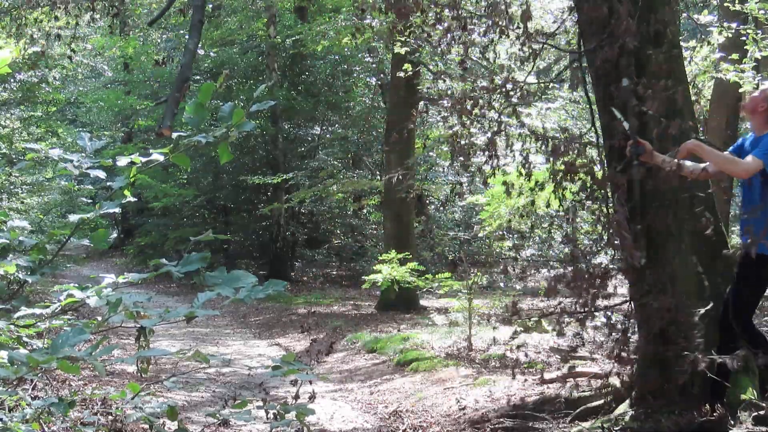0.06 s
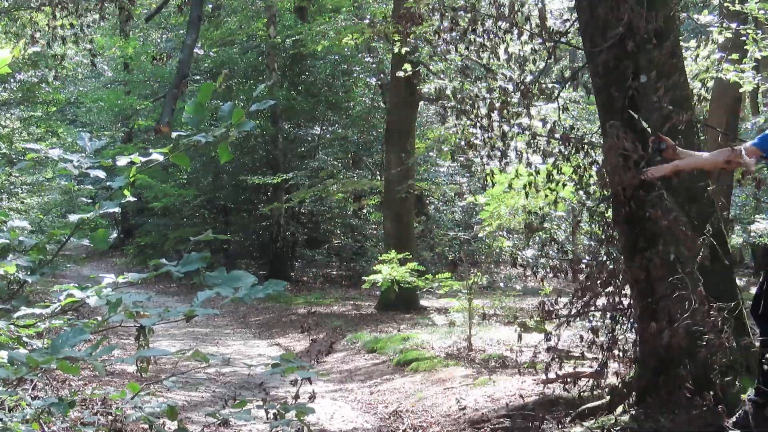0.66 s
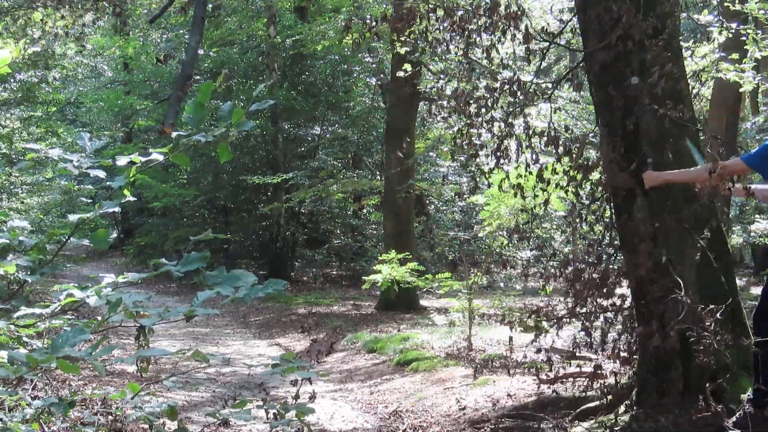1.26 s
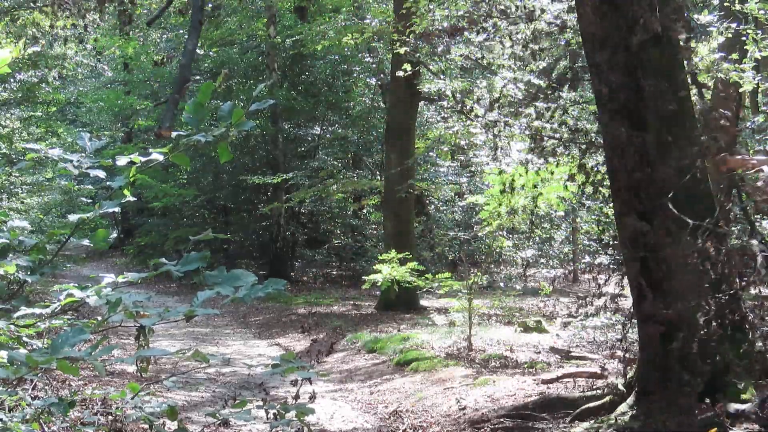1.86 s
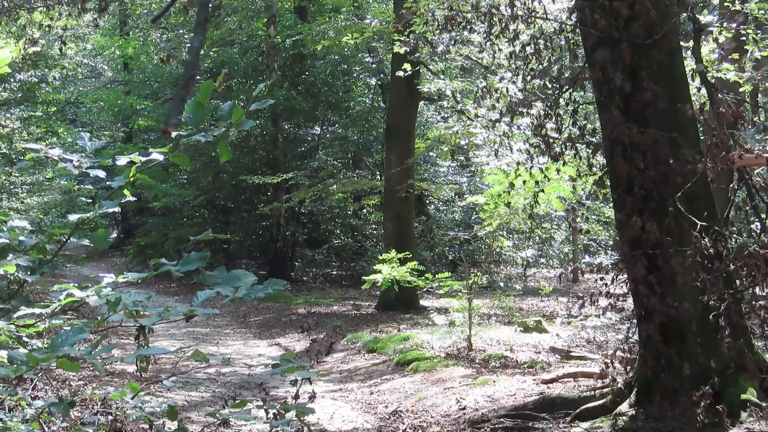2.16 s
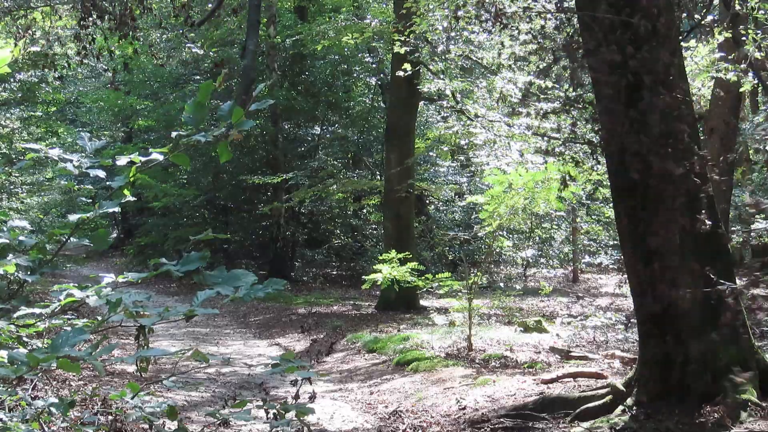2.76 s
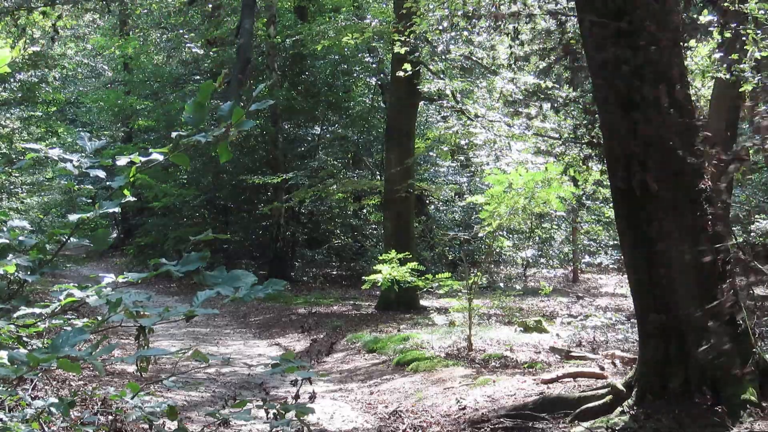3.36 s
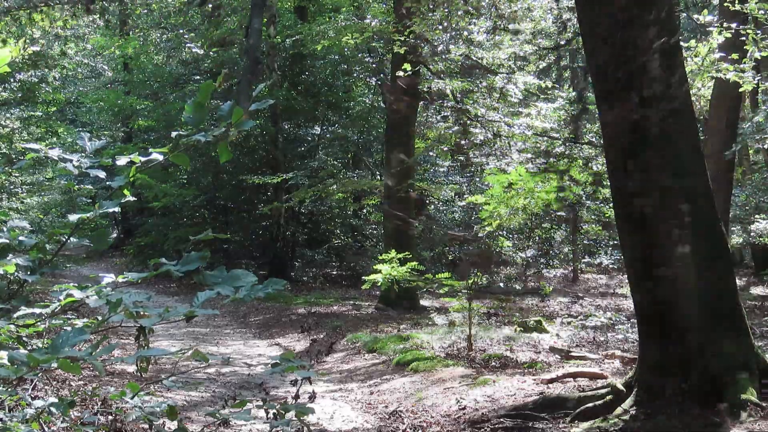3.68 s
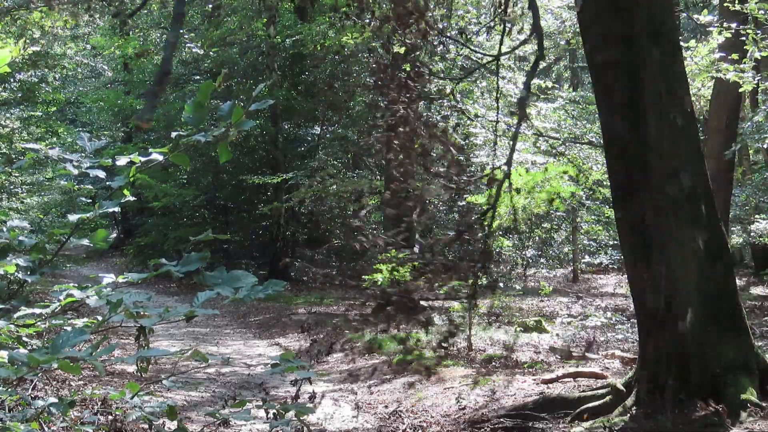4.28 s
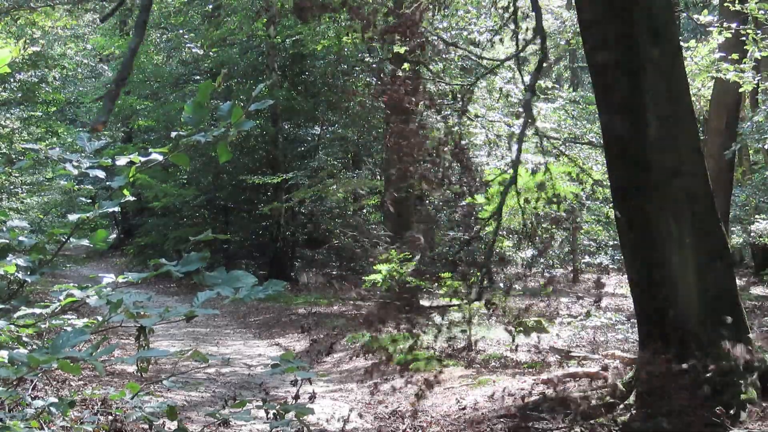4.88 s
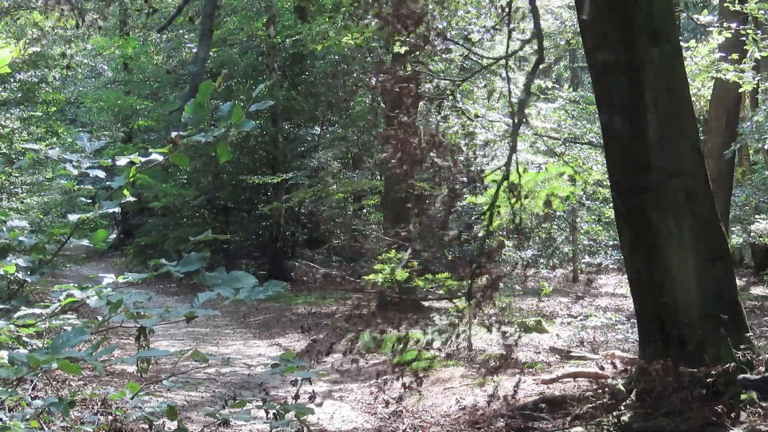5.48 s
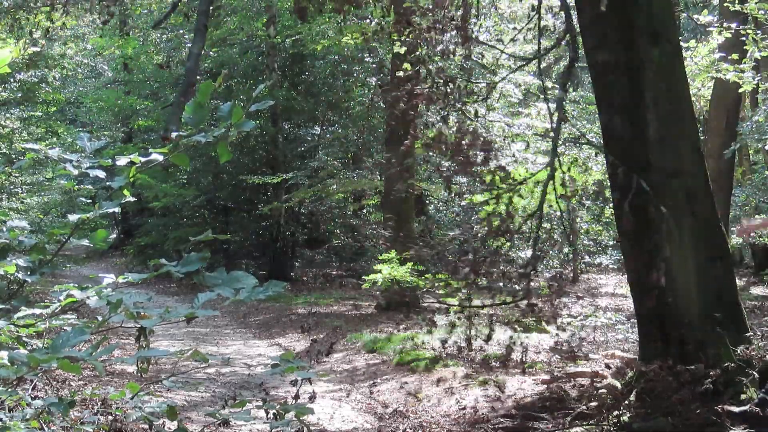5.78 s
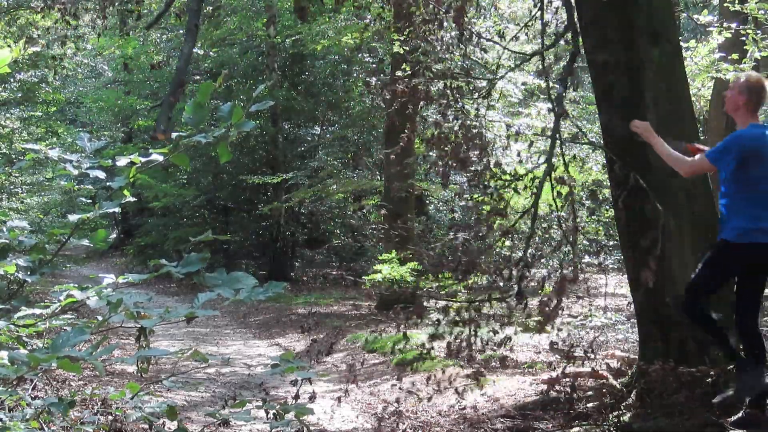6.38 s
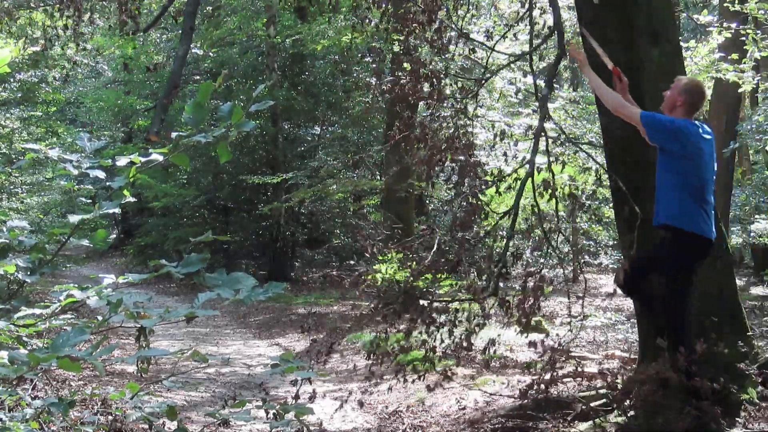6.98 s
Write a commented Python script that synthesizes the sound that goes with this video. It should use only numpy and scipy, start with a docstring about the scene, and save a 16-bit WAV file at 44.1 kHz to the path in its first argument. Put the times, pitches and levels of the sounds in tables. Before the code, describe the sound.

Crisp leaves shake and twigs scrape as someone pulls on a dead limb, slightly to the right in stereo. The wood gives way in a single loud, splintering crack, followed by sharp twig snaps. A swell of rustling ends in a short, hollow knock as the limb lands. After a lull come a few dull footfalls and crackles, over the faint low rumble of still forest air.

```python
"""Dry leaves rustle over the still air of a quiet wood: a dead limb is being pulled off a trunk,
just right of the stereo microphones. Its fibres tear and the wood rings in one loud crack; twigs snap,
the crown sweeps down and the butt knocks on the ground. Then the leaves settle and feet scuffle at
the trunk. Near foliage and far trees scatter every blow back."""
import sys
import numpy as np
from scipy import signal
from scipy.fft import rfft, irfft
from scipy.io import wavfile

SR = 44100
rng = np.random.default_rng(int(sys.argv[2]) if len(sys.argv) > 2 else 0)


def to_wav(s):
    """Save 16-bit WAV."""
    ch = np.atleast_2d(s).T  # columns
    pcm = np.round(np.clip(ch, -1, 1) * 32767)  # PCM
    wavfile.write(sys.argv[1], SR, pcm.astype(np.int16))


N = 310464

# still forest air: (frequency [Hz], relative density [dB])
AIR_COLOUR = [(20, -8.5), (45, 0), (65, 0.5), (95, -6.5), (150, -6), (230, -9.5), (380, -11), (520, -13.5),
              (750, -15.5), (1300, -21), (3000, -26.5), (7000, -33), (15000, -55)]
# how alike the quiet background is at the two microphones: (frequency [Hz], likeness [0-1])
AIR_LIKENESS = [(30, 0.99), (70, 0.99), (140, 0.77), (280, 0.01), (600, 0.09), (1200, 0.05), (4000, 0.36),
                (12000, 0.7)]
# a faint steady hum: (frequency [Hz], width [Hz], level [dB])
HUM_BANDS = [(497, 39, -71.5), (960, 56, -71)]
# what trunks and foliage throw back: (frequency [Hz], gain [dB])
ECHO_COLOUR = [(100, 8), (350, -8), (700, 5.5), (1400, 0.5), (2500, -3.5), (4000, 0.5), (7000, 5),
               (14000, 4.5)]
# how long the far trunks answer: (frequency [Hz], t60 [s])
ECHO_T60 = [(100, 0.77), (700, 0.51), (2000, 0.66), (5000, 0.77), (14000, 0.63)]
# dry leaves ticking: (frequency [Hz], relative density [dB])
LEAF_COLOUR = [(1200, -11.5), (2500, -7), (4000, -4), (5500, -1.5), (7300, -0.5), (10000, -5.5),
               (13000, -5), (15500, -16)]
# twigs scraping: (frequency [Hz], relative density [dB])
SCRAPE_COLOUR = [(90, -23), (180, -3), (400, 0), (800, -2.5), (1100, -2.5), (1700, 3), (2600, -1),
                 (4000, -12.5), (8000, -19)]
# each tug, swing or fall shakes the crown: (start [s], swell [s], hold [s], leaves [dB], twigs [dB])
SHAKES = [(-0.02, 0.12, 0.14, -53, -61.5), (0.323, 0.074, 0.14, -61, -66),
          (1.04, 0.044, 0.092, -70.5, -85.5), (1.282, 0.054, 0.27, -63, -75),
          (1.575, 0.49, 0.15, -49.5, -55), (2.215, 0.037, 0.025, -46, -60), (2.461, 0.086, 0.27, -53, -60),
          (2.747, 0.094, 0.037, -52, -56.5), (2.983, 0.055, 0.093, -54, -60),
          (3.24, 0.049, 0.1, -59, -64.5), (3.414, 0.24, 0.2, -44.5, -52), (4.087, 0.14, 0.12, -50.5, -57.5),
          (4.302, 0.15, 0.23, -46, -51), (4.584, 0.046, 0, -42, -57), (4.957, 0.064, 0.037, -55.5, -59),
          (5.49, .08, 0, -57.5, -67), (5.806, 0.13, 0.36, -61.5, -69.5), (6.384, 0.023, 0.048, -61, -69.5),
          (6.544, 0.085, 0.043, -51, -56.5), (6.69, 0.14, 0, -56, -81)]
# limb and feet on the ground: (time [s], level [dB], treble cutoff [Hz], t60 [s])
THUDS = [(.618, -50.5, 1400, 0.06), (1.366, -53, 1200, .05), (1.925, -46, 260, .2),
         (2.095, -46.5, 400, 0.12), (2.808, -48.5, 890, 0.081), (4.3964, -48.5, 503, 0.14),
         (4.6157, -31.5, 1600, 0.03), (4.6239, -37, 600, 0.049), (4.637, -58, 1400, 0.032),
         (4.645, -51.5, 220, 0.13), (6.042, -56, 1290, 0.22), (6.583, -52, 300, .13),
         (6.618, -48, 340, .18), (6.719, -51, 322, 0.16)]
# the butt's knock, choked by the soil: (frequency [Hz], level [dB], t60 [s])
BUTT_MODES = [(425, -30.5, 0.033), (725, -30.5, 0.029), (1040, -26.5, 0.023), (1600, -27, 0.013),
              (2080, -38, .012)]
# the louder twigs breaking: (time [s], ring [dB], pitch [Hz], splinters [dB], splinter t60 [s])
SNAPS = [(0.6173, -46, 1160, -59, .018), (1.2982, -50, 4260, -55.5, .07), (1.364, -51, 2150, -48.5, 0.054),
         (1.368, -48, 5200, -54, .04), (2.2433, -53, 2380, -42.5, .06), (2.739, -26.5, 3040, -31, 0.025),
         (2.8067, -34, 2260, -27, 0.022), (2.8101, -38.5, 1260, -36, 0.036),
         (3.523, -54, 2960, -44.5, 0.096), (3.7868, -42, 1790, -42, 0.023), (4.3148, -45, 4480, -38, .02),
         (4.397, -46, 1680, -44.5, .07), (4.6217, -50, 3000, -35, .034), (4.637, -40, 2220, -37.5, 0.13),
         (6.041, -50, 1110, -56, 0.045), (6.486, -52, 4160, -60, .035), (6.5466, -53, 4300, -56, 0.044),
         (6.572, -49, 4570, -49, .035), (6.616, -45, 2080, -46, 0.16), (6.857, -54, 5400, -52, 0.046)]
# the ring of a snapped twig: (multiple of its pitch [ratio], relative level [dB])
STICK_MODES = [(1, 3), (1.08, -9), (1.38, -16), (1.7, -15), (.72, -27)]
# a twig's fine fibres tearing: (frequency [Hz], relative density [dB])
SPLINTER_COLOUR = [(60, -37), (200, -28), (700, -5), (1500, 3), (3000, 7), (5500, 1), (8000, -2.5),
                   (12000, -3.5), (15500, -15)]
# the limb's thick fibres tearing: (frequency [Hz], relative density [dB])
CRACK_COLOUR = [(60, -30), (160, -15), (320, 4), (700, -25.5), (1050, -6), (1400, -5), (2000, 2),
                (3000, 3.5), (4600, -1.5), (7000, -6.5), (10000, -11), (13000, -14), (15500, -24)]
# the ring of the whole limb: (frequency [Hz], relative level [dB], t60 before the cap in struck_wood [s])
LIMB_MODES = [(136, -24, .1), (347, -10, 0.033), (394, -32, 0.063), (644, -17, 0.11), (727, -6, 0.033),
              (880, -6.5, 0.064), (1140, -7, 0.019), (1353, -4, 0.029), (1550, 3.5, 0.06),
              (1786, -3.5, 0.036), (1880, -2, 0.017), (2060, -4, 0.041), (2470, -15, 0.063),
              (2630, -13.5, 0.034), (2830, -9, 0.028), (3420, -22, 0.016), (4510, -7, 0.024),
              (7350, -12, 0.021)]
# the limb gives way in a quick run: (time [s], ring [dB], splinters [dB], splinter t60 [s])
RUPTURES = [(1.8862, -53, -24.5, 0.054), (1.8873, -28, -10, 0.015), (1.89, -49, -27, 0.013),
            (1.8925, -24, -34, 0.017), (1.8941, -17, -45, 0.042), (1.9002, -26.5, -31, 0.11),
            (1.912, -43, -34, 0.17), (1.945, -66, -45, 0.68)]


def from_db(db):
    """Decibels to gain."""
    return 10 ** (np.asarray(db) / 20)


def rms_one(x):
    """Scale to rms 1."""
    return x / np.sqrt(np.mean(x ** 2) + 1e-20)


def at_hz(points, hz):
    """A curve read on a log-frequency axis."""
    f, value = np.transpose(points)
    return np.interp(np.log(np.maximum(hz, 1)), np.log(f), value)


def bins(x):
    """Frequencies of the transform of x."""
    return np.fft.rfftfreq(x.shape[-1], 1 / SR)


def coloured(x, spectrum):
    """Filter x by a smooth spectrum."""
    return irfft(rfft(x) * from_db(at_hz(spectrum, bins(x))), x.shape[-1])


def filtered(x, kind, hz, order):
    """A Butterworth low-pass or high-pass."""
    return signal.sosfilt(signal.butter(order, hz, kind, fs=SR, output="sos"), x + 1e-18)


def drift(per_s):
    """A random wander through per_s values a second."""
    knots = rng.standard_normal(4096)
    return np.interp(np.arange(N) / SR * per_s, np.arange(len(knots)), knots)


def dying(t60, size=16384):
    """An envelope that falls 60 dB in t60 seconds."""
    return from_db(-60 * np.arange(size) / SR / t60)


def add(out, start_s, sound):
    """Mix a sound in at start_s."""
    i = round(start_s * SR)
    out[i:i + len(sound)] += sound[:N - i]


def stereo_noise(likeness, size):
    """White noise on which the two microphones agree more in some bands than in others."""
    white = rng.standard_normal((2, size))
    mid, side = rfft(white)
    alike = np.clip(at_hz(likeness, bins(white)), 0, 1)
    return irfft(np.sqrt(1 + alike) * mid + np.sqrt(1 - alike) * side * [[1], [-1]], size)


def hum(hz, width_hz):
    """Noise in one narrow resonance, heard as a blurred tone."""
    radius, angle = np.exp(-np.pi * width_hz / SR), 2 * np.pi * hz / SR
    poles = [1, -2 * radius * np.cos(angle), radius ** 2]
    return rms_one(signal.lfilter([.5, 0, -.5], poles, rng.standard_normal(N)))


def forest_air(level_db=-57.5, waver_db=1.0):
    """The bed of the place: a low, far rumble that wavers slightly, with a faint hum in it."""
    air = rms_one(coloured(stereo_noise(AIR_LIKENESS, N), AIR_COLOUR))
    air *= from_db(level_db - waver_db * drift(per_s=7.3))
    return air + sum(from_db(db) * hum(hz, width_hz) for hz, width_hz, db in HUM_BANDS)


def tree_echoes(blows, near_db=5.5, near_t60=0.047, build_s=0.0024):
    """Foliage near the microphones scatters a quick wash of echoes, far trunks a longer tail."""
    noise = stereo_noise([(200, 1.0), (2000, 1.0), (4500, 0.88), (8000, 0.54), (13000, 0.17)], SR)
    spectrum, hz, tail = rfft(noise), bins(noise), 0
    near = from_db(near_db) * dying(near_t60, SR)
    edges_hz = np.geomspace(50, SR / 2, 14)
    for low, high in zip(edges_hz, edges_hz[1:]):
        band = irfft(spectrum * ((hz >= low) & (hz < high)), SR)
        far = dying(at_hz(ECHO_T60, np.sqrt(low * high)), SR)
        tail += band * (near + far)
    tail *= 1 - np.exp(-np.arange(SR) / SR / build_s)
    response = coloured(rms_one(tail) / np.sqrt(SR), ECHO_COLOUR)
    return signal.fftconvolve(blows[None], response, axes=1)[:, :N]


def shake(t, swell_s, hold_s, calm_db_per_s):
    """One shake, t seconds after its start: it swells, holds while the limb moves, then dies away."""
    swell = np.sin(np.pi / 2 * np.clip(t / swell_s, 0, 1))
    return swell * from_db(-calm_db_per_s * np.maximum(t - swell_s - hold_s, 0))


def agitation(leaf_rest_db=-76, twig_rest_db=-78, flutter_db=-10):
    """Gains of leaves and twigs: never quite still, and overlapping shakes add in power."""
    t = np.arange(0, N, 64) / SR
    leaf_power, twig_power = from_db(leaf_rest_db) ** 2, from_db(twig_rest_db) ** 2
    for start, swell_s, hold_s, leaf_db, twig_db in SHAKES:
        age = t - start
        # most leaves calm down quickly, but a few flutter on
        rush = from_db(leaf_db) * shake(age, swell_s, hold_s, calm_db_per_s=63.5)
        flutter = from_db(leaf_db + flutter_db) * shake(age, swell_s, hold_s, calm_db_per_s=11)
        scrape = from_db(twig_db) * shake(age, swell_s, hold_s, calm_db_per_s=45.5)
        leaf_power += rush ** 2 + flutter ** 2
        twig_power += scrape ** 2
    return [np.interp(np.arange(N) / SR, t, np.sqrt(power)) for power in (leaf_power, twig_power)]


def rustle(colour, per_s, clump_db, lag_spread_s=1.5e-5):
    """Countless tiny contacts in clumps; each reaches the two microphones with a lag of its own."""
    touched = rng.random(N) < per_s / SR
    size_db = np.minimum(rng.exponential(1, N), 4)
    contacts = touched * from_db(size_db) * rng.choice([-1, 1], N)
    left = contacts * from_db(clump_db * drift(per_s=70))
    lag = np.round(lag_spread_s * SR * rng.standard_normal(N)).astype(int)
    right = np.bincount((np.arange(N) + lag) % N, left, N)
    return rms_one(coloured(np.array([left, right]), colour))


def crackle(per_s=1300, low_hz=2554, high_hz=10080, t60=0.009):
    """Stiff leaves and twig ends flick each other, each with a brief pitch of its own."""
    out, t = np.zeros(N), np.arange(512) / SR
    fade = dying(t60, len(t))
    for when, pitch, size in rng.random((int(per_s * N / SR), 3)):
        hz = low_hz + (high_hz - low_hz) * pitch
        size_db = min(-np.log(size), 4)
        add(out, when * (N - 1) / SR, from_db(size_db) * fade * np.sin(2 * np.pi * hz * t))
    return rms_one(out)


def crown(leaf_gain, twig_gain, crackle_db=-6):
    """Dry leaves tick brightly and crackle; the twigs that carry them scrape lower."""
    leaves = rustle(LEAF_COLOUR, per_s=9000, clump_db=1.24)
    twigs = rustle(SCRAPE_COLOUR, per_s=2500, clump_db=2.5)
    leaves += from_db(crackle_db) * crackle()
    return leaves * leaf_gain + twigs * twig_gain


def ground_thuds(bass_cut_hz=120):
    """The soft forest floor takes the edge off a blow and damps it at once."""
    out = np.zeros(N)
    for start, level_db, cutoff_hz, t60 in THUDS:
        fade = dying(t60)
        crush = filtered(fade * rng.standard_normal(len(fade)), "low", cutoff_hz, order=3)
        crush -= filtered(crush, "low", bass_cut_hz, order=1)
        crush *= np.linalg.norm(fade) / np.linalg.norm(crush)
        add(out, start, from_db(level_db) * crush)
    return out


def struck_wood(modes, longest_t60=0.06):
    """Dead wood rings only briefly after a blow; neighbouring modes swing in opposite directions."""
    t, ring = np.arange(16384) / SR, 0
    for k, (hz, db, t60) in enumerate(modes):
        fade = dying(min(t60, longest_t60), len(t))
        ring += (-1) ** k * from_db(db) * fade * np.sin(2 * np.pi * hz * t)
    return ring


def butt_landing(start_s=4.6161):
    """The thick end hits the soil with one short, hollow knock."""
    out = np.zeros(N)
    add(out, start_s, struck_wood(BUTT_MODES))
    return out


def splinters(colour, t60, uneven_db):
    """Fibres tear in a burst of uneven clicks that dies away."""
    fade = dying(t60)
    sizes, spread = rng.standard_normal((2, len(fade)))
    clicks = sizes * from_db(uneven_db * np.clip(spread, -2, 2))
    burst = fade * coloured(clicks, colour)
    return burst * np.linalg.norm(fade) / np.linalg.norm(burst)


def small_snaps(leaf_gain, per_s=4, relative_db=-3, low_hz=1700, high_hz=5900, splinter_t60=0.044):
    """Small twigs break at random, louder the harder the crown shakes; returns rows as in SNAPS."""
    rows = []
    for when, pitch in rng.random((int(per_s * N / SR), 2)):
        i = int(when * (N - 1))
        db = 20 * np.log10(leaf_gain[i]) + relative_db
        hz = low_hz + (high_hz - low_hz) * pitch
        rows.append((i / SR, db, hz, db, splinter_t60))
    return rows


def twig_snaps(rows, stick_t60=0.023, click_db=2.5):
    """Each snap is a short ping of the broken stick, one hard click and a spray of splinters."""
    pings, cracks = np.zeros(N), np.zeros(N)
    for start, ring_db, hz, splinter_db, splinter_t60 in rows:
        ping = struck_wood([(hz * ratio, db, stick_t60) for ratio, db in STICK_MODES])
        click = from_db(click_db) * splinters(SPLINTER_COLOUR, t60=0.0045, uneven_db=4.0)
        spray = splinters(SPLINTER_COLOUR, splinter_t60, uneven_db=4.5)
        add(pings, start, from_db(ring_db) * ping)
        add(cracks, start, from_db(splinter_db) * (click + spray))
    return pings, cracks


def far_crack(level_db=2.0):
    """Out at the surrounding trees, the limb's ruptures merge into a single report."""
    click = np.zeros(N)
    add(click, RUPTURES[1][0], np.ones(1))  # at the loudest tear
    report = coloured(click, CRACK_COLOUR)
    return from_db(level_db) * report / np.linalg.norm(report)


def limb_break():
    """The crack at the trunk: fibres tear first; as the core lets go, the whole limb rings."""
    ring, tearing = np.zeros(N), np.zeros(N)
    knock = struck_wood(LIMB_MODES)
    for start, ring_db, splinter_db, t60 in RUPTURES:
        add(ring, start, from_db(ring_db) * knock)
        add(tearing, start, from_db(splinter_db) * splinters(CRACK_COLOUR, t60, uneven_db=2.0))
    ring = filtered(ring, "high", hz=100, order=2)  # the ring carries no deep bass
    return ring, tearing


def from_the_right(pair, lag_s=4.5e-6):
    """The tree stands just to the right, so its sound reaches the left microphone later."""
    delay = np.exp(-2j * np.pi * bins(pair) * lag_s)
    return np.array([irfft(rfft(pair[0]) * delay, N), pair[1]])


def scene():
    """At the microphones: blows arrive directly and again from the trees, over the rustle and the air."""
    leaf_gain, twig_gain = agitation()
    ring, tearing = limb_break()
    knocks = ground_thuds() + butt_landing()
    pings, cracks = twig_snaps(SNAPS + small_snaps(leaf_gain))
    limb_to_trees = far_crack() + from_db(-12) * ring
    twigs_to_trees = from_db(-8) * pings + from_db(-4.5) * cracks
    echoes = tree_echoes(limb_to_trees + twigs_to_trees + from_db(-11.5) * knocks)
    direct = ring + tearing + pings + cracks + knocks + crown(leaf_gain, twig_gain)
    return forest_air() + echoes + from_the_right(direct)


def record(dry, headroom=0.45, cutoff_hz=15800):
    """The recorder rounds the loudest peaks and cuts the top steeply."""
    rounded = headroom * np.tanh(dry / headroom)
    return signal.sosfilt(signal.ellip(10, .1, 80, cutoff_hz, fs=SR, output="sos"), rounded)


dry = scene()
out = record(dry)
to_wav(out)
```